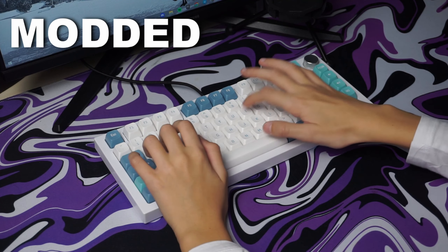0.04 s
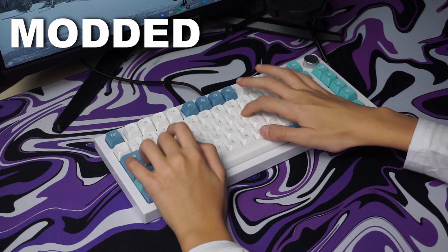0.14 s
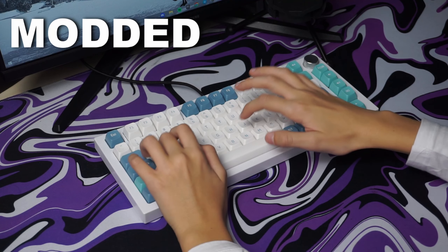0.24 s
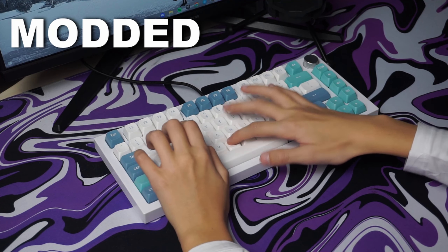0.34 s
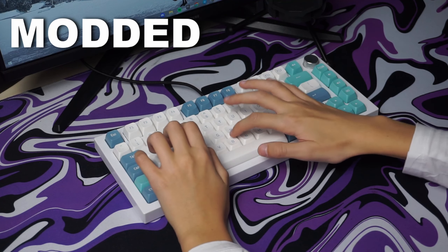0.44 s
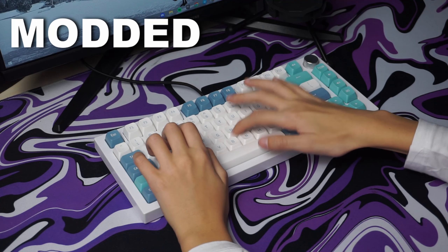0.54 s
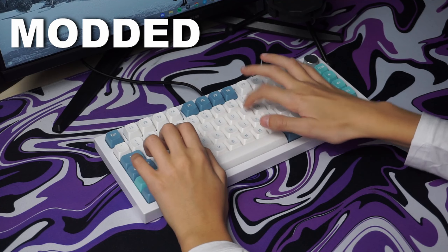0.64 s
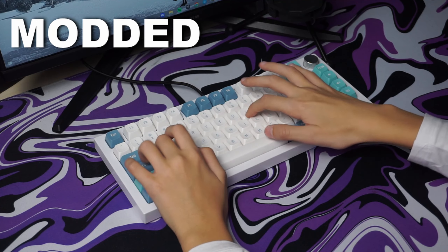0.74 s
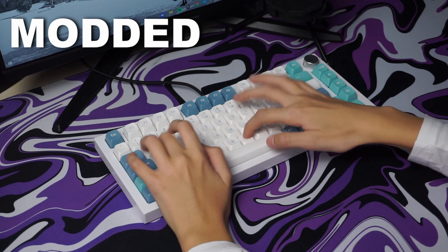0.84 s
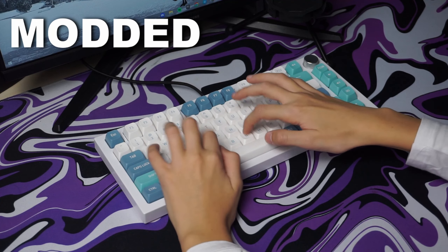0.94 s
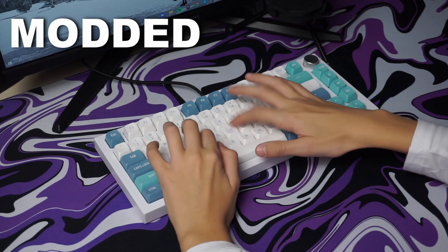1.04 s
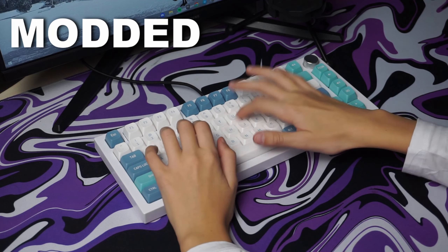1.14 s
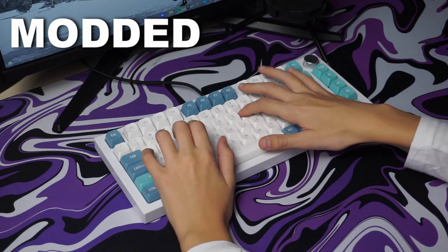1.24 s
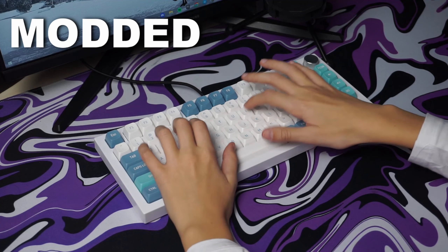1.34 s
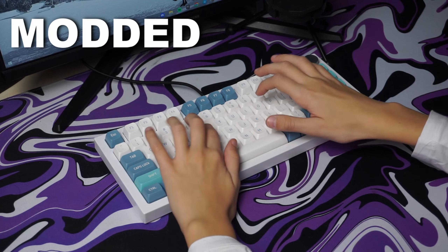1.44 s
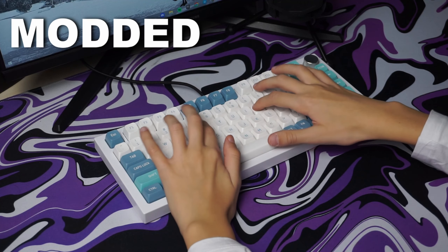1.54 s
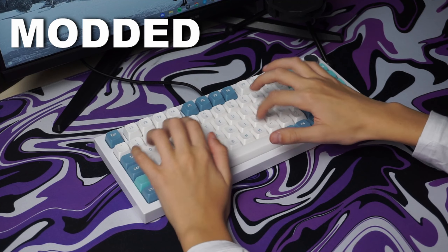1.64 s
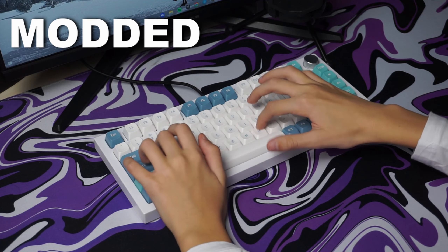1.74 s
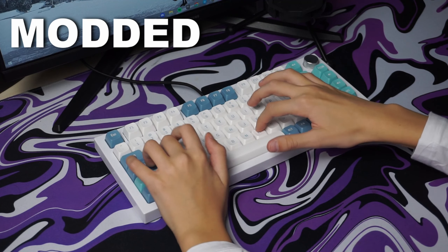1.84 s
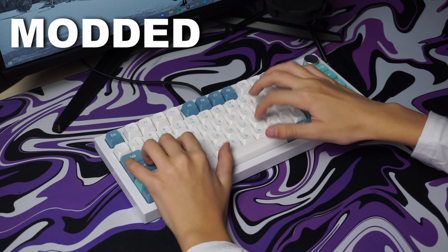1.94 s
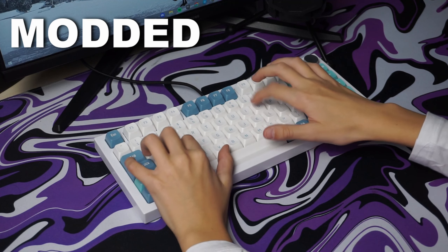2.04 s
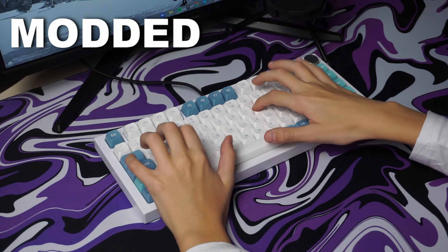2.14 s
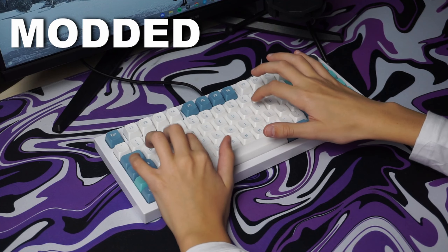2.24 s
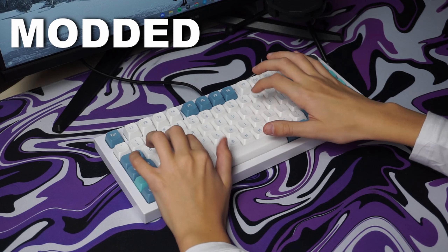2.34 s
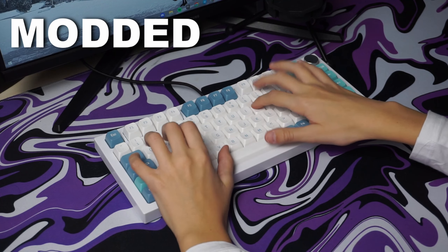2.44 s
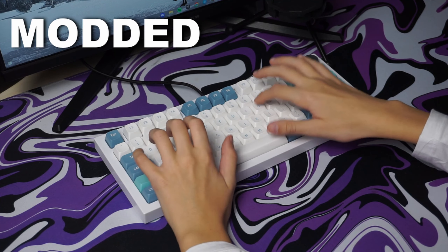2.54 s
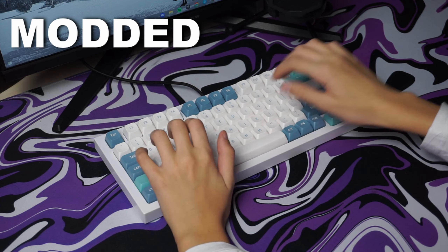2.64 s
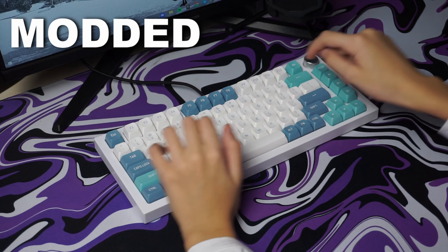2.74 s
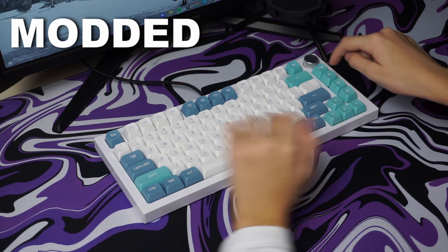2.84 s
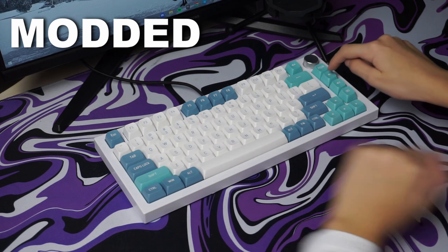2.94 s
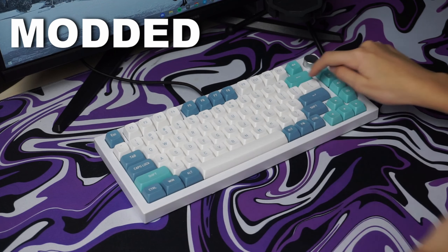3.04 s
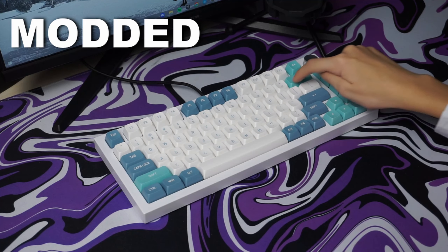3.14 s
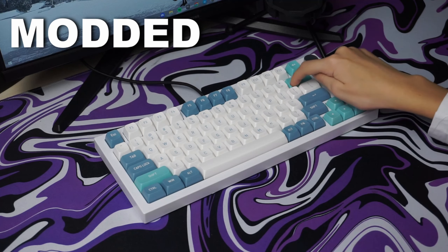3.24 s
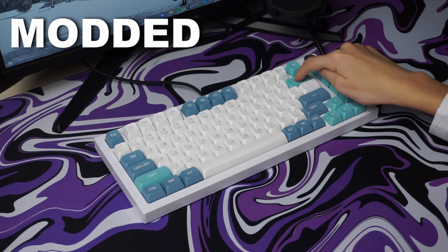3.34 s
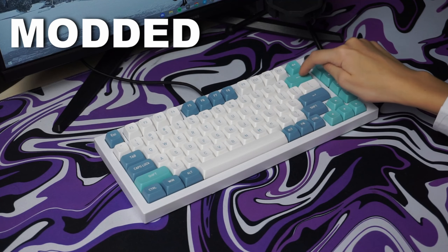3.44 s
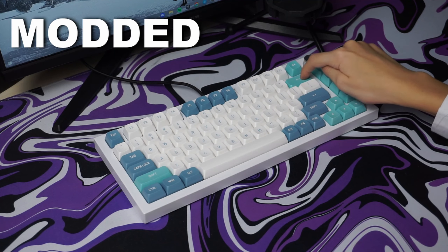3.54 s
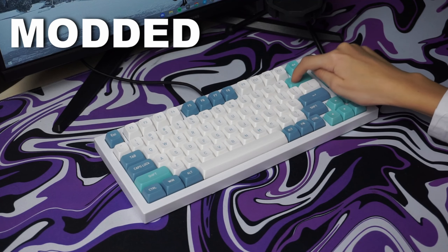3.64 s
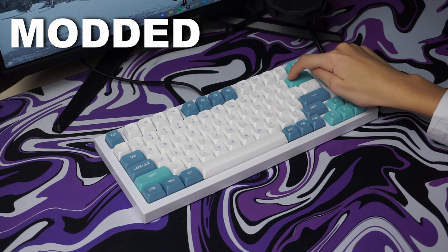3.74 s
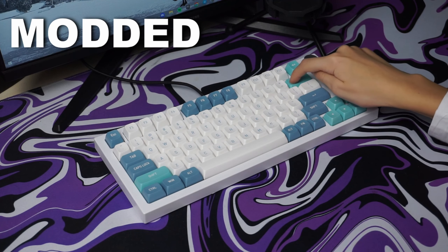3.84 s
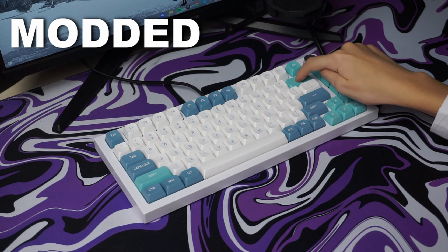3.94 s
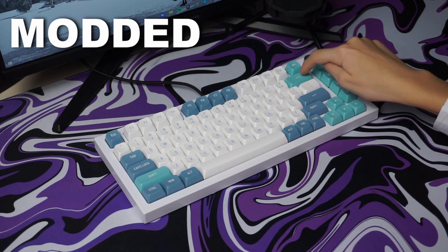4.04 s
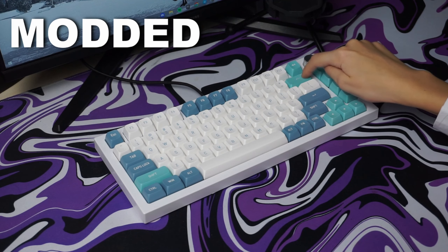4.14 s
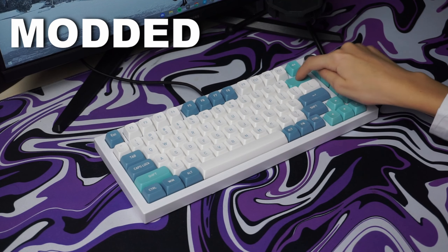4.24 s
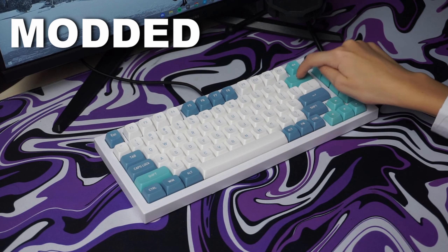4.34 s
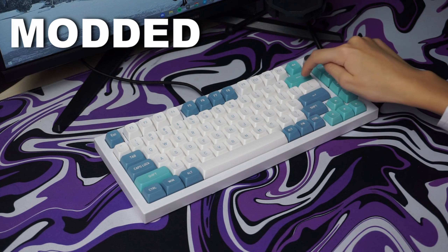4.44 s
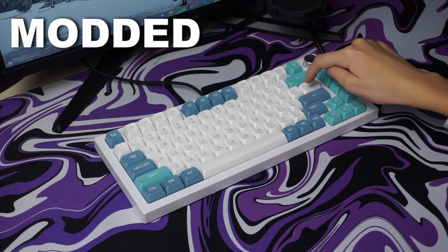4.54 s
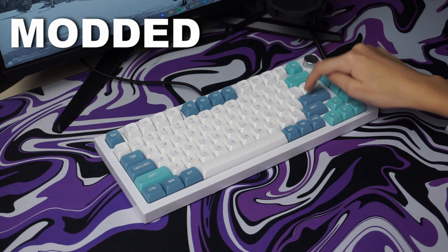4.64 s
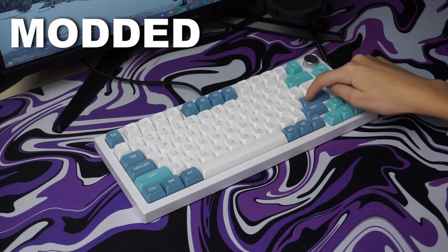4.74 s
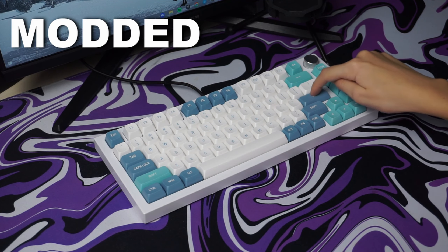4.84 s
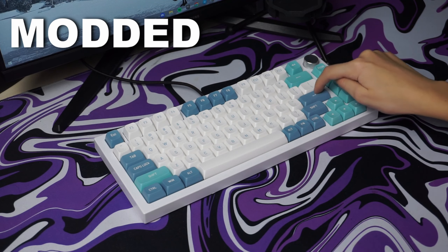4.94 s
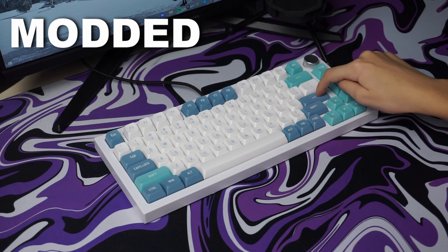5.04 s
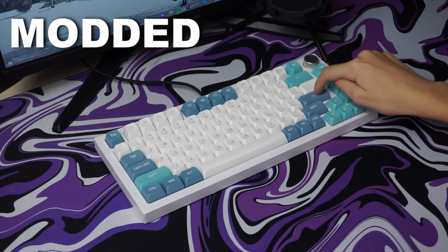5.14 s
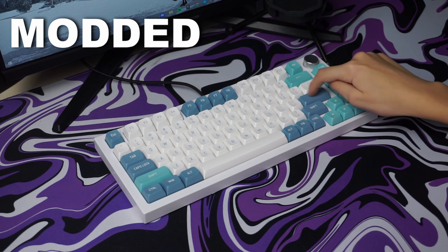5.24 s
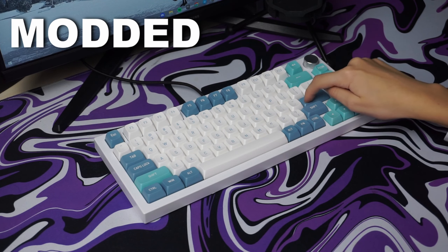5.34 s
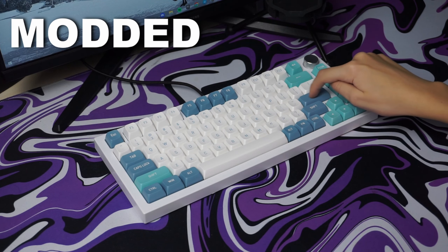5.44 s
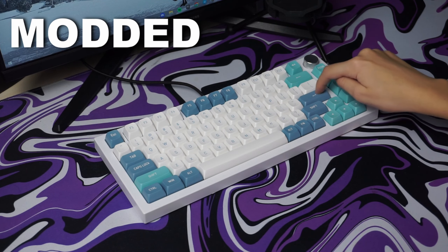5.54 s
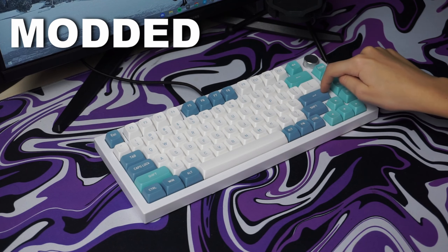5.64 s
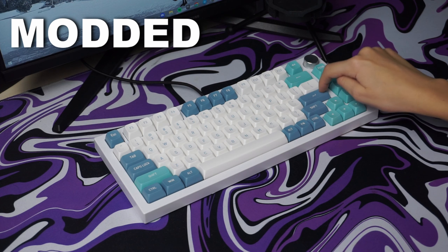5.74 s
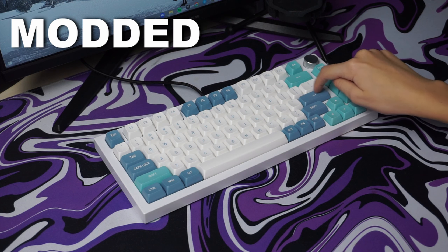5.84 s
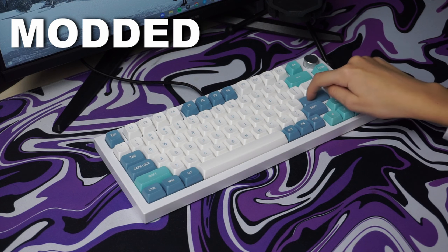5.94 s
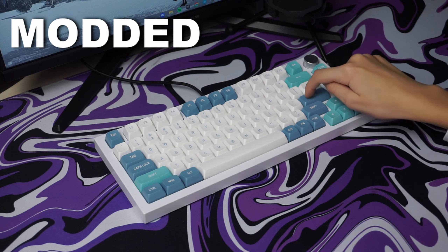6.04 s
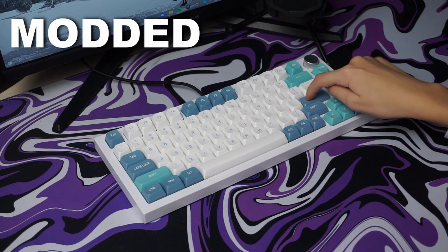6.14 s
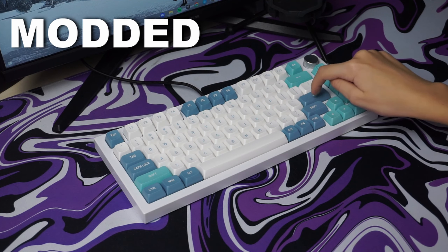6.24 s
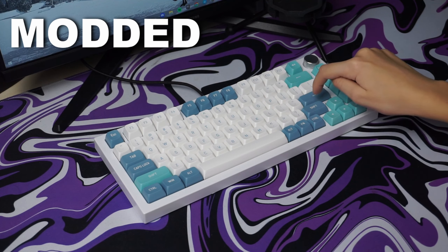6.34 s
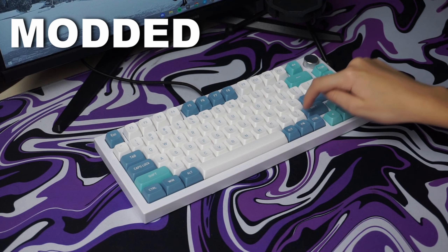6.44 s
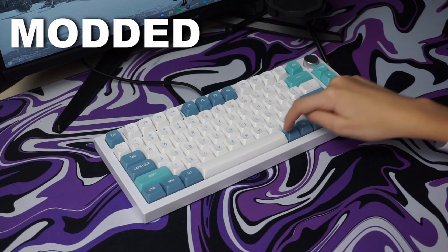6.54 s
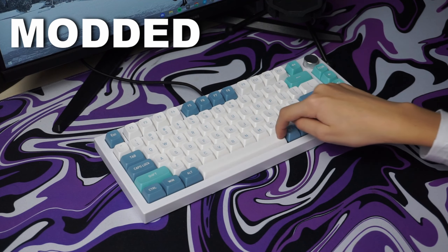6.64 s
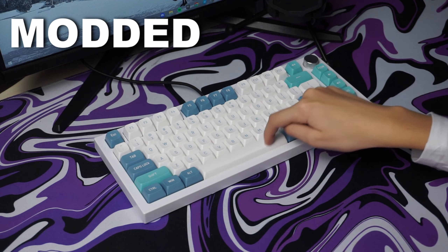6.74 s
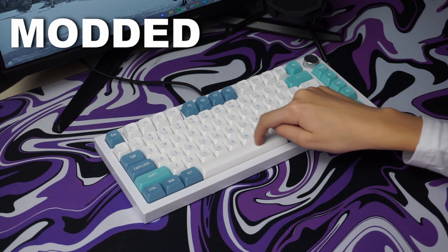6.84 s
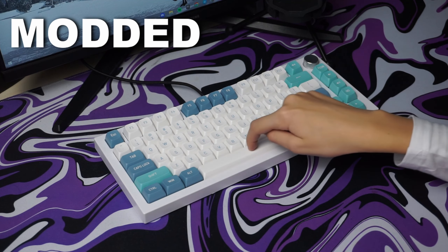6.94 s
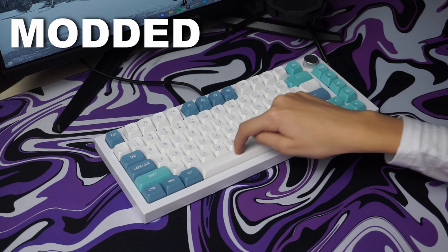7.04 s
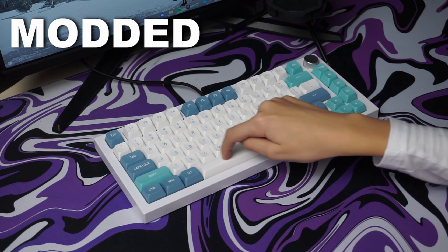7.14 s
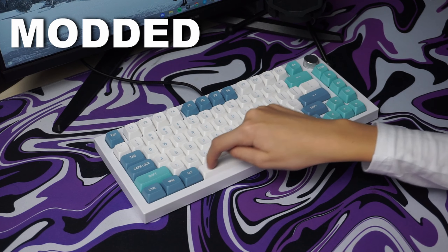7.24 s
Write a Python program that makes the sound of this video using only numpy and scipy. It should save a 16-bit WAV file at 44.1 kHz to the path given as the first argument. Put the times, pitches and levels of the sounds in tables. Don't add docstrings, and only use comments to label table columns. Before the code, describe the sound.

A soft, low fan hum runs throughout in a small, fairly dry room, with the microphone close to a foam-damped mechanical keyboard on a desk mat. From 0 to 2.6 s two hands type quickly and unevenly, roughly ten clacks a second: rounded, creamy plastic knocks around the upper mids, soft fingertip scuffs, lighter return snaps, and fuller space bar hits near 1.4, 2.0, 2.15, 2.4 and 2.55 s with a faint wire ping. From 2.6 to 3.2 s there is mostly hum, sleeve rustle and a very faint tap. From 3.2 to 4.4 s single wide keys clack down about every 0.15 s, each snapping back brighter. After a short pause, slightly lower taps continue from 4.7 to 6.2 s. Another gap, then deep, hollow space bar strokes and returns at 6.65 to 7.2 s. Loud hits overload slightly; treble drops out for instants.

```python
import sys
import numpy as np
from scipy import signal
from scipy.fft import rfft, irfft, next_fast_len
from scipy.io import wavfile

SR = 44100
rng = np.random.default_rng(int(sys.argv[2]) if len(sys.argv) > 2 else 0)


def int16_out(signal):
    q = np.round(np.clip(np.atleast_2d(signal).T, -1, 1) * 32767)
    wavfile.write(sys.argv[1], SR, q.astype(np.int16))


def gain_from_decibels(decibels):
    exponent = np.asarray(decibels, float) / 20
    return 10 ** exponent


N = 321489


def seconds(length_s):
    return np.arange(int(SR * length_s)) / SR


def band(x, hz, width_hz):
    return signal.lfilter(*signal.iirpeak(min(hz, 0.45 * SR), hz / width_hz, fs=SR), x)


def fade(t, t60_s):
    return np.exp(-np.log(1000) * t / t60_s)


def onset(t, rise_s):
    return np.minimum(t / rise_s, 1)


def ending(t):
    return np.minimum((t[-1] - t) * 20, 1)


def unit(x):
    return x / np.abs(x).max()


def add(out, start_s, x):
    i = max(int(start_s * SR), 0)
    out[i:i + len(x)] += x[:N - i]


def ring(t, modes, chance, scatter_db=3, detune=0.078):
    out = np.zeros(len(t))
    for (hz, db, t60_s), (harder, sharper) in zip(modes, chance):
        tone = np.sin(2 * np.pi * hz * (1 + detune * sharper) * t)
        out += gain_from_decibels(db + scatter_db * harder) * fade(t, t60_s) * tone
    return out


def curve(table):
    return gain_from_decibels(np.interp(np.arange(N) / SR, *np.transpose(table)))


def shaped(points):
    hz, db = np.transpose(points)
    size = next_fast_len(N)
    log_hz = np.log(np.maximum(np.fft.rfftfreq(size, 1 / SR), 1))
    gain = gain_from_decibels(np.interp(log_hz, np.log(hz), db, left=-90, right=-120))
    x = irfft(rfft(rng.standard_normal(size)) * gain, size)[:N]
    return x / np.std(x)


# pitch_hz, density_db (per Hz)
FAN_SPECTRUM = [(25, -53.5), (42, -5.5), (111, -3.5), (123, -11), (139, -1), (187, -2), (266, -5.5),
                (294, -12), (406, -16), (496, -21.5), (534, -17), (621, -20.5), (6000, -47.5),
                (8940, -48.5), (16300, -54.5)]


def fan():
    return gain_from_decibels(-35.5) * shaped(FAN_SPECTRUM)


# time_s, level_db
ARM_ROCKING = [(0.0, -37.5), (0.81, -39), (1.08, -30.5), (2.11, -35), (2.25, -22), (3.21, -38.5),
               (3.33, -19), (3.78, -35), (4.53, -38), (4.67, -66), (4.91, -39), (4.95, -44.5), (7.29, -51)]


def desk_rumble():
    return curve(ARM_ROCKING) * shaped([(14, -0.5), (18, 4), (21, 6), (25, -34)])


# time_s, level_db
SLEEVE_RUSTLE = [(0.0, -45), (1.7, -58), (2.6, -54.5), (2.7, -54), (2.8, -41), (3.15, -44.5), (3.4, -56.5),
                 (4.5, -74.5), (5.9, -46), (6.4, -69.5), (6.8, -39.5)]


def rustle():
    hiss = shaped([(2500, 14), (5000, 9), (7400, 7.5), (8500, 10.5), (9800, 7), (12000, 2.5), (16000, -3)])
    return gain_from_decibels(-13) * curve(SLEEVE_RUSTLE) * hiss


# delay_s, level_db
NEAR_ECHOES = [
    (.010, -30),
    (0.02, -47),
    (0.034, -27),
]
# pitch_hz, level_db, t60_s
ROOM_BANDS = [(141, -30, 0.44), (395, -23.5, 0.06), (940, -25.5, 0.056), (1520, -35, 0.35),
              (2520, -23.5, 0.5), (3250, -22, 0.4), (6000, -21, 0.69), (9350, -9.5, 0.44),
              (15000, -36.5, 0.16)]


def room(x):
    t = seconds(0.5)
    tail = np.zeros(len(t))
    for hz, db, t60_s in ROOM_BANDS:
        part = band(rng.standard_normal(len(t)), hz, 1.28 * hz) * fade(t, t60_s) * onset(t, 0.00067)
        tail += gain_from_decibels(db) * part / np.sqrt(np.mean(part ** 2) * len(t) * hz / 8000)
    for delay_s, db in NEAR_ECHOES:
        smear = rng.standard_normal(128) * np.hanning(128)
        add(tail, delay_s, gain_from_decibels(db) * band(smear, 2400, 1800) / 2)
    return signal.fftconvolve(x, tail / 3)[:N]


# pitch_hz, width_hz, level_db
PLAIN_HOUSING = [(3900, 870, 15), (5120, 1800, 22.5), (7000, 280, 27.5), (9900, 1500, 32),
                 (13000, 2500, -30.5), (15100, 1500, -33.5)]


def crack(t, t60_s, chance, housing=PLAIN_HOUSING):
    burst = rng.standard_normal(len(t)) * (fade(t, t60_s) + gain_from_decibels(-39) * fade(t, 6 * t60_s))
    return unit(sum(gain_from_decibels(db + 3 * c) * band(burst, hz, w) for (hz, w, db), c in zip(housing, chance)))


# start_s, level_db
FINGER_LANDINGS = [(0.115, -16.5), (0.192, -16), (0.377, -24.5), (0.552, -29.5), (0.707, -18.5),
                   (0.8898, -4.5), (0.991, -22.5), (1.256, -26.5), (1.473, -26.5), (1.553, -19),
                   (1.72, -30), (1.838, -35.5), (1.997, -18), (2.107, -22.5), (2.399, -29), (2.478, -18),
                   (3.219, -31), (3.962, -36), (4.118, -27.5), (4.719, -26), (4.883, -29), (5.023, -28),
                   (5.634, -39), (6.644, -20)]
# start_s, level_db
CAP_TICKS = [(0.776, -27), (1.098, -27), (1.104, -38), (2.128, -34), (2.291, -18), (3.473, -22),
             (5.191, -40), (5.785, -23.5), (6.116, -59.5), (6.197, -56), (6.741, -26), (6.776, -34),
             (6.891, -26), (6.935, -33), (7.101, -41)]


def fingers():
    out, t = np.zeros(N), seconds(0.1)
    for touches, treble_db in [(FINGER_LANDINGS, -11), (CAP_TICKS, 7.5)]:
        for start_s, db in touches:
            scuff = rng.standard_normal(len(t)) * fade(t, 0.04) * onset(t, 0.00044)
            dull = unit(band(scuff, 2300, 1200) + 1.1 * band(scuff, 1300, 800))
            bright = crack(t, 0.0049, rng.standard_normal(6))
            add(out, start_s, gain_from_decibels(db) * (dull + gain_from_decibels(treble_db) * bright))
    return out


# start_s, level_db
WIRE_HITS = [
    (1.374, -18),
    (1.4813, -9.5),
    (2.1558, -4),
    (2.4325, -18),
    (2.556, -4.5),
    (6.954, -19),
    (7.04, -22),
    (7.2025, -9),
]
# pitch_hz, level_db, t60_s
WIRE_MODES = [(3870, -2, 0.016), (3800, -10, .012), (3865, -21, 0.1), (3850, -31, .3), (3770, -30, 0.12)]


def wires():
    out, t = np.zeros(N), seconds(0.5)
    for start_s, db in WIRE_HITS:
        tone = ring(t, WIRE_MODES, rng.standard_normal((5, 2)), scatter_db=1, detune=0.003)
        add(out, start_s + 0.001, gain_from_decibels(db) * tone)
    return out


# pitch_hz, level_db, t60_s
DESK_MODES = [(67, -26, 0.23), (47, -28.5, 0.13), (102.2, -27, 0.14), (148.4, -19.5, 0.052),
              (188, -39.5, 0.4)]
# pitch_hz, level_db, t60_s
BAR_THUD_MODES = [(64.7, -22, 0.29), (200.3, -13.5, 0.098), (115, -30, 0.066)]


def thud(desk, t, start_s, db, case_db, group, chance):
    if group == "bar":
        shake = ring(t, BAR_THUD_MODES, chance[5:], scatter_db=4, detune=0.011)
        add(desk, start_s + 0.002, gain_from_decibels(0.5 * db - 4) * shake * onset(t, 0.0037) * ending(t))
    boom = ring(t, DESK_MODES, chance, detune=0.071) * onset(t, 0.0087) * ending(t)
    load_db = 0.06 * (case_db + 25)
    add(desk, start_s + 0.0037, gain_from_decibels(db + load_db) * boom)


# from_s, to_s, pitch_hz, width_hz, level_db (re crack), t60_s
SPRING_BANDS = [(0, 2.0, 10490, 503, -26.5, 0.19), (0, 2.0, 6970, 600, -39, 0.11),
                (2.0, 2.7, 8940, 1800, -35, 0.1), (0, 2.0, 8850, 1500, -30, 0.35),
                (0, 2.7, 12400, 497, -53.5, 0.1), (3.1, 4.5, 5256, 201, -32, 0.21),
                (3.1, 4.5, 6820, 503, -33.5, 0.13), (3.1, 4.5, 10020, 710, -41.5, .08),
                (3.1, 4.5, 12600, 700, -41, 0.077), (4.6, 6.4, 5780, 198, -40, 0.2),
                (4.6, 6.4, 6320, 300, -31.5, 0.28), (4.6, 6.4, 9860, 900, -34.5, 0.28),
                (6.5, 7.3, 7000, 300, -53.5, 0.21), (6.5, 7.3, 3820, 300, -25.5, 0.2)]


def springs(t, start_s, crack_db):
    out = np.zeros(len(t))
    for from_s, to_s, hz, width_hz, db, t60_s in SPRING_BANDS:
        if from_s <= start_s < to_s:
            level_db = 0.73 * crack_db - 4 + db + 2 * rng.standard_normal()
            grain = band(band(rng.standard_normal(len(t)), hz, width_hz), hz, width_hz)[::-1]
            out += gain_from_decibels(level_db) * grain / np.std(grain) * (fade(t, t60_s) + gain_from_decibels(28) * fade(t, 0.0042))
    return out


def rattle(t):
    grain = rng.standard_normal(len(t)) * (fade(t, 0.012) + gain_from_decibels(-24) * fade(t, 0.1))
    return unit(band(grain, 1360, 650) + 0.39 * band(grain, 1890, 800) + 0.14 * band(grain, 2100, 1100))


WASH_GROUPS = {"letters": (0.1, 1.03), "upper": (0.1, 1), "middle": (-0.5, 0.89), "bar": (3.3, 1.33)}


def wash(t, hz, group):
    db, wide = WASH_GROUPS[group]
    grain = rng.standard_normal(len(t)) * fade(t, 0.24) * onset(t, 0.0066) * ending(t)
    edges_hz = [0.44 * hz, 1.104 * wide * hz]
    sos = signal.butter(2, edges_hz, "band", fs=SR, output="sos")
    return gain_from_decibels(db - 26.5) * unit(signal.sosfilt(sos, band(grain, hz, 1.8 * hz)))


# pitch_hz, level_db, t60_s
CASE_MODES = [(456, 6.5, 0.2), (300, 3, 0.09), (612, 2, 0.19), (720, -18.5, 0.026)]
# pitch_hz, level_db, t60_s
BAR_CASE_MODES = [(420, 6, 0.036), (340, 2, 0.026), (450, -1, .035), (283, 1.5, 0.065), (520, -6, .04),
                  (600, -0.5, 0.04), (694, 1, 0.049)]
PLATE_MODES = {"letters": [(1127, -4.5, 0.1), (1023, -11.5, 0.051), (1498, -4.5, 0.034), (1217, -5.5, 0.11),
               (1657, -6.5, 0.012)], "upper": [(1147, 4, 0.035), (860, 0, 0.023), (1260, -15, 0.05),
               (1610, -2, 0.046), (1058, -3, 0.059), (1945, -25, 0.026), (2110, -4.5, 0.023),
               (3350, -8, 0.017)], "middle": [(1176, 3.5, 0.031), (1003, 3, 0.035), (857, -5.5, 0.033),
               (1295, -3.5, 0.027), (1500, -7, 0.067), (2480, -11, 0.063), (3660, -8.5, 0.015)],
               "bar": [(1203, 4, 0.041), (1356, 7.5, 0.018), (1630, -10.5, 0.05), (1850, 5, 0.0095),
               (2300, -5, 0.08), (2640, -19.5, .03), (3170, -10, .03)]}


def plate_and_case(t, group, plate_db, case_db, plate_chance, case_chance):
    foam = fade(t, 0.055)
    case_modes = BAR_CASE_MODES if group == "bar" else CASE_MODES
    plate = ring(t, PLATE_MODES[group], plate_chance, scatter_db=3.5, detune=0.012)
    case = ring(t, case_modes, case_chance, scatter_db=5, detune=0.024)
    return gain_from_decibels(plate_db) * unit(plate * foam) + gain_from_decibels(case_db) * unit(case * foam)


# pitch_ratio, level_db, t60_s
CAP_MODES = [(1.0034, 27.5, 0.0088), (0.83, 5, 0.03), (0.55, -28, 0.02), (0.92, -14, 0.007),
             (0.41, -14, 0.017), (0.32, -37, 0.0041), (1.3, -35, 0.0083)]


def cap_ring(t, hz, chance):
    loose = np.sign(np.arange(9))[:, None]
    return unit(ring(t, [(ratio * hz, db, t60_s) for ratio, db, t60_s in CAP_MODES], chance * loose))


HOLLOW_DIPS = {"letters": [(1273, 80, 0.8)], "upper": [(1377, 32, 0.3), (1710, 130, 0.7), (3085, 110, 0.8),
               (526, 180, 0.2)], "middle": [(1096, 14, 0.9), (1547, 140, 1), (2865, 330, 0.65),
               (4120, 310, 0.9)], "bar": [(916, 140, 0.6), (1990, 130, 0.6), (267, 173, 1)]}


def hollow(x, group):
    for hz, width_hz, depth in HOLLOW_DIPS[group]:
        x = x - depth * band(x, hz, width_hz)
    return x


# start_s, cap_db, cap_hz, plate_db (re cap), crack_db (re cap)
LETTERS_DOWN = [(0.0004, -8.5, 2160, 1, -20), (0.1239, 3.5, 2355, -4.5, -22),
                (0.1953, -1.5, 2300, -4.5, -21), (0.385, 3.5, 2050, -2, -22.5),
                (0.5872, -4, 2270, -8, -14.5), (0.7142, 9, 2200, -8.5, -26.5),
                (0.7983, -1, 2300, -5.5, -23), (0.8921, 5, 1720, -5.5, -20.5),
                (0.9976, 9.5, 2085, -12, -17.5), (1.1107, -7.5, 2330, -3.5, -20.5),
                (1.1748, -3, 2320, 0, -18), (1.268, 2.5, 2400, -3, -28.5), (1.3505, 4.5, 2340, -6.5, -31.5),
                (1.4828, 6.5, 2296, -6, -28.5), (1.5603, 5.5, 2220, -5.5, -20),
                (1.7334, 3, 2420, -12, -24.5), (1.8582, 0, 2210, -55.5, -25),
                (1.95, -5.5, 2170, -11, -22.5), (2.1162, 5, 2260, -7, -8), (2.2973, 3.5, 2280, -2.5, -22),
                (2.4863, 9.5, 2215, -25, -10.5), (3.0191, -27, 1660, 2.5, -55)]
# start_s, cap_db, cap_hz, plate_db (re cap), crack_db (re cap)
LETTERS_UP = [(0.2033, -6.5, 1800, 1.5, -43.5), (0.303, -10.5, 2400, 3.5, -11), (0.459, -4.5, 2030, 2, -18),
              (0.5927, -13, 2170, 9, -24), (0.7859, -5.5, 1840, 1.5, -37), (0.9813, -4.5, 2220, -2, -16),
              (1.0861, -4.5, 2370, -0.5, -13), (1.165, -11, 2370, 1, -23), (1.572, -8, 2300, -0.5, -26),
              (1.6496, -4.5, 2510, 0, -10.5), (1.8018, -8, 2270, 2.5, -16), (2.0545, -10, 1890, 4.5, -7.5),
              (2.22, -6.5, 2300, -0.5, -7)]
# start_s, cap_db, cap_hz, plate_db (re cap), crack_db (re cap)
BAR_STROKES = [(1.3751, -8.5, 1600, 4, -27), (2.0086, 4, 2110, 3, -9), (2.0143, -4, 1930, -49, -33),
               (2.1488, -16, 2480, 14, 5), (2.157, 3.5, 2560, -1.5, -3.5), (2.4149, -13.5, 2480, 13.5, 5.5),
               (2.4342, 6.5, 2060, 1.5, -7.5), (2.5571, 1, 2110, 3, -5.5), (2.5663, -17, 2436, 0, 10),
               (6.659, 10, 2013, -3.5, -16), (6.6653, -14, 1710, -31, -8), (6.733, -12.5, 2640, 5, -7),
               (6.8026, 0, 1630, 2, -26), (6.8851, -10.5, 2500, 4, -4), (6.9535, 6.5, 2030, -5.5, -21),
               (7.0394, -7.5, 2530, -1, -9), (7.1308, -7.5, 1590, 1, -13), (7.2012, -9.5, 2510, 4.5, 1)]
# start_s, cap_db, cap_hz, plate_db (re cap), crack_db (re cap)
WIDE_DOWN = [(3.2337, 3.5, 2430, -41, -51.5), (3.3858, 10.5, 2650, -6.5, -21.5),
             (3.5449, 1, 2110, -30, -36), (3.7007, 0.5, 2410, -7, -32), (3.8358, 8, 2390, -12, -19),
             (3.9845, 1.5, 1910, 2.5, -25.5), (4.1366, 3.5, 2370, -12.5, -54),
             (4.2831, 5.5, 2600, -5.5, -29), (4.7342, 9.5, 2090, -6, -22), (4.9053, -2.5, 2120, 1, -26),
             (5.0497, 0, 2040, 1.5, -29), (5.2093, 0.5, 2000, 2, -22), (5.3728, 7.5, 2120, -6.5, -29.5),
             (5.8096, -0.5, 2040, 0.5, -26.5), (5.9777, 8, 2110, -5, -27), (6.1282, 7, 2184, -3, -49)]
# start_s, cap_db, cap_hz, crack_db (re cap)
WIDE_UP = [(3.3032, -5.5, 2640, -6), (3.4628, -6.5, 2480, -10), (3.6135, -5, 2520, -6.5),
           (3.7668, -6, 2520, -9.5), (3.909, -6.5, 2690, -7), (4.0563, -7.5, 2520, -7),
           (4.2056, -5, 1800, -7), (4.365, -7.5, 2490, -5.5), (4.815, -2, 1880, -18.5),
           (4.9775, -8, 1990, -20), (5.1347, -8.5, 2180, -16), (5.283, 1, 1970, -16),
           (5.449, 0.5, 1870, -17), (5.5944, -15.5, 1945, -23), (5.72, -12, 1950, -22),
           (5.8855, -7.5, 2110, -16), (6.0546, -2.5, 1930, -11), (6.2175, -2.5, 1870, -9.5)]


def strikes():
    wide_up = [(start_s, db, hz, 3.5, crack_db) for start_s, db, hz, crack_db in WIDE_UP]
    # rows, key, stroke, case level for a 0 dB blow, case dB per cap dB
    kinds = [(LETTERS_DOWN, "letters", " down", -25, 0.47), (LETTERS_UP, "letters", " up", -37, 0.47),
             (BAR_STROKES, "bar", " down", -3.5, 0.48),
             (WIDE_DOWN, "wide", " down", -27, 0.47), (wide_up, "wide", " up", -15.5, 0.47)]
    blows = []
    for rows, key, direction, case_db, slope in kinds:
        for row in rows:
            start_s, db = row[:2]
            group, stroke = key, direction
            if key == "wide":
                group = "upper" if start_s < 4.5 else "middle"
            if key == "bar" and db < -2:
                stroke = " up"
            blows.append((*row, case_db - (1 - slope) * db, group, stroke))
    return blows


SWITCH_HOUSING = {"letters down": [(3720, 180, 1), (6140, 1050, -3), (8400, 380, -12), (10400, 830, 1.5),
                  (11900, 380, -13), (14700, 640, -9.5)], "letters up": [(4480, 220, 2.5), (8400, 330, -1),
                  (10500, 610, 0.5)], "bar down": [(3740, 360, 2.5), (5430, 260, -11.5), (6900, 280, -0.5),
                  (8600, 500, -10), (9500, 410, -9), (10600, 270, -17.5), (12500, 620, -21),
                  (15000, 300, -26.5)], "bar up": [(4000, 330, 4), (7000, 290, -8.5), (8900, 680, -11.5),
                  (10380, 610, -4), (11500, 220, -8), (15000, 310, -21.5)], "upper down": [(3880, 580, 0),
                  (4800, 270, 0), (6210, 330, -6), (9840, 370, -12), (11900, 570, -10.5), (13800, 270, -26),
                  (15070, 640, -22)], "upper up": [(5070, 260, -2), (6520, 380, -9.5), (8400, 320, -14.5),
                  (9980, 370, 1.5), (11900, 940, -12.5)], "middle down": [(3600, 280, -4.5),
                  (4590, 380, -7), (5420, 330, 0), (6300, 420, -2.5), (8600, 280, -14), (9610, 335, -8),
                  (13400, 690, -14.5), (15450, 580, -24)], "middle up": [(3400, 190, -4), (4530, 330, 16),
                  (6100, 200, -15), (9800, 610, -13), (11760, 530, -12), (15100, 605, -20.5)]}


def keys():
    out, desk, caps, t = np.zeros(N), np.zeros(N), np.zeros(N), seconds(0.2)
    push = onset(t, 0.00056)
    for start_s, db, hz, plate_db, crack_db, case_db, group, stroke in strikes():
        chance = rng.standard_normal((6, 9, 2))
        housing, housing_chance = SWITCH_HOUSING[group + stroke], chance[3, :, 0]
        cap = cap_ring(t, hz, chance[0])
        body = cap + plate_and_case(t, group, plate_db, case_db, chance[1], chance[2])
        body += gain_from_decibels(-8) * rattle(t) + wash(t, hz, group)
        body *= push
        body += gain_from_decibels(crack_db + 1) * crack(t, 0.003, housing_chance, housing)
        bounce_s = 0.016 + 0.00023 * abs(chance[5, 0, 0])
        bounce_db = crack_db - 30 + 3.3 * chance[5, 1, 0]
        add(body, bounce_s, gain_from_decibels(bounce_db) * crack(t[:2000], 0.0074, housing_chance, housing))
        body += springs(t, start_s, crack_db)
        add(out, start_s + 0.00055, gain_from_decibels(db + 1.5) * hollow(body, group))
        add(caps, start_s + 0.00055, gain_from_decibels(db + 1.5) * hollow(cap * push, group))
        thud(desk, t, start_s, db, case_db, group, chance[4])
    return out, desk, caps


def scene():
    clicks, desk, caps = keys()
    near = clicks + fingers()
    to_walls = near - 0.23 * caps
    background = fan() + desk_rumble() + rustle()
    return (near + wires() + desk + room(to_walls) + background)[None]


# start_s, above_hz
TREBLE_DROPOUTS = [(.72, 4200), (1.212, 3800), (.51, 5000), (1.448, 4500), (1.868, 4000), (2.318, 4800),
                   (2.6, 5000), (3.176, 3000), (3.322, 7000), (3.478, 10800), (3.796, 7500), (3.881, 5800),
                   (3.92, 5800), (4.118, 7900), (4.456, 4500), (4.646, 3500), (4.657, 3500), (4.668, 3500),
                   (5.01, 4500), (5.419, 7200), (6.354, 7400), (6.482, 5000), (6.59, 3000), (6.819, 6500),
                   (7.275, 5700)]


def drop_treble(x):
    out, length_s = x.copy(), 0.014
    for start_s, hz in TREBLE_DROPOUTS:
        a, b = int((start_s - 0.01) * SR), int((start_s + length_s + 0.01) * SR)
        piece = out[:, a:b]
        t = np.arange(piece.shape[1]) / SR
        gate = np.clip(np.minimum(t - 0.007, length_s + 0.013 - t) / 0.003, 0, 1)
        treble = signal.sosfiltfilt(signal.butter(8, hz, "high", fs=SR, output="sos"), piece)
        out[:, a:b] = piece - 0.88 * gate * treble
    return out


def top_cut(x):
    return signal.sosfilt(signal.butter(12, 16420, fs=SR, output="sos"), x)


def record(dry):
    steep = signal.ellip(10, 0.5, 60, 15750, fs=SR, output="sos")
    gentle = signal.butter(6, 16600, fs=SR, output="sos")
    loud = np.clip(signal.sosfilt(steep, dry), -1, 1)
    loud = np.clip(signal.sosfiltfilt(gentle, loud), -1, 1)
    return top_cut(drop_treble(loud))


dry = scene()
out = record(dry)
int16_out(out)
```